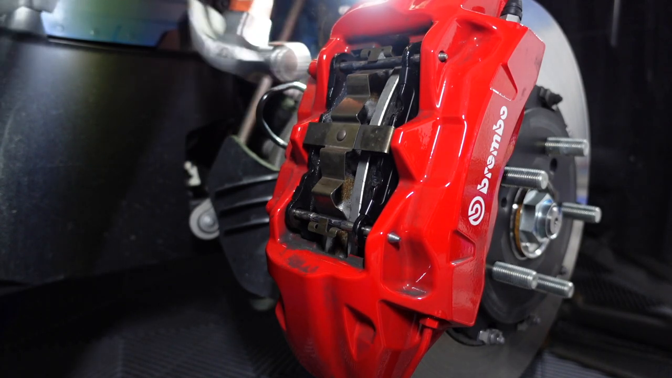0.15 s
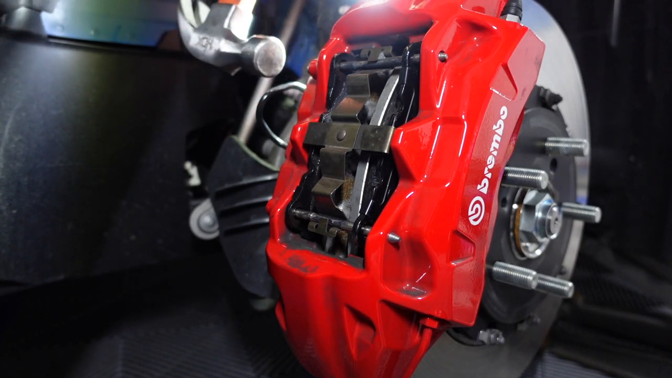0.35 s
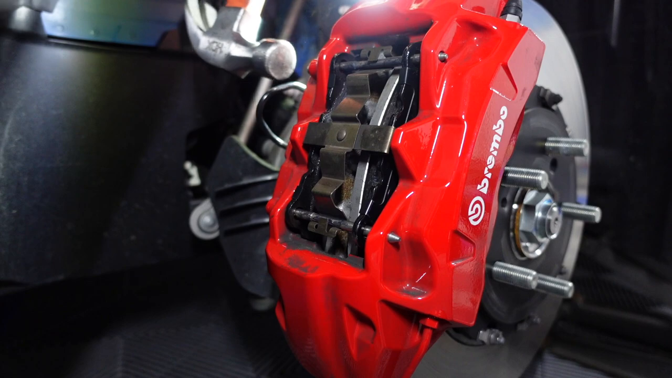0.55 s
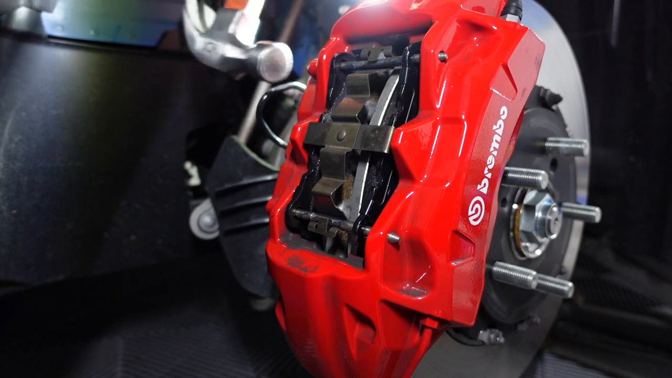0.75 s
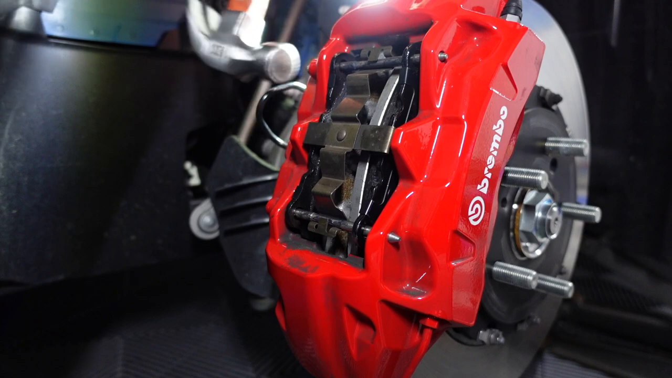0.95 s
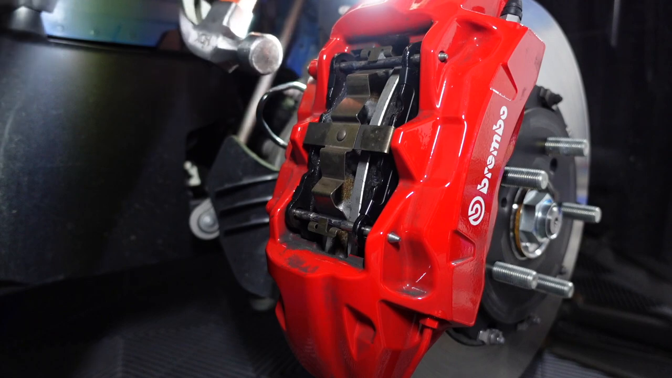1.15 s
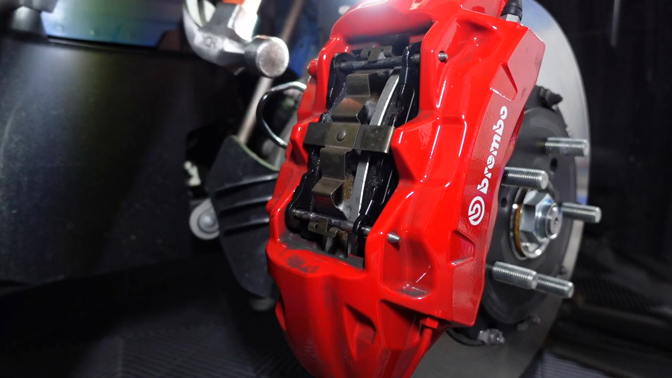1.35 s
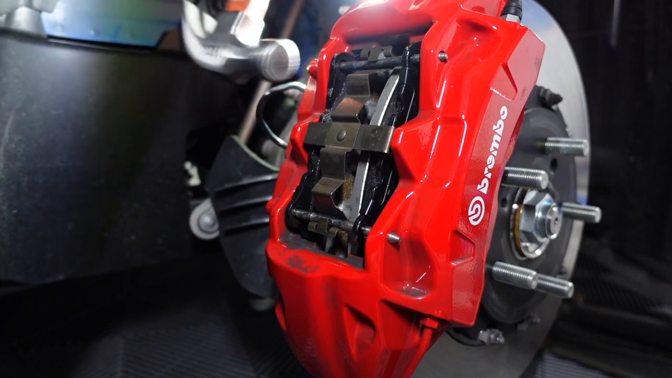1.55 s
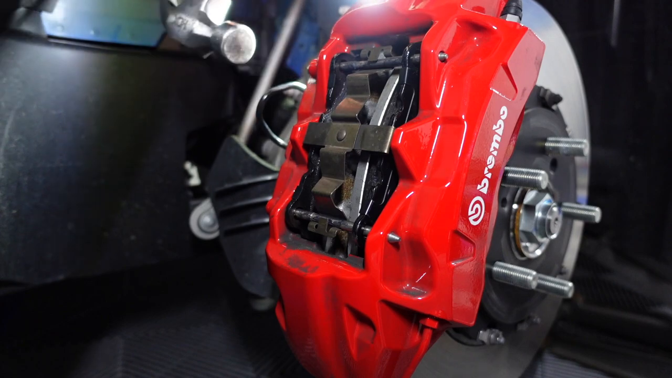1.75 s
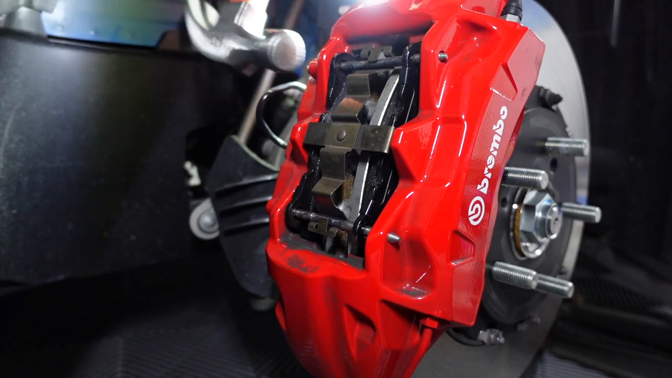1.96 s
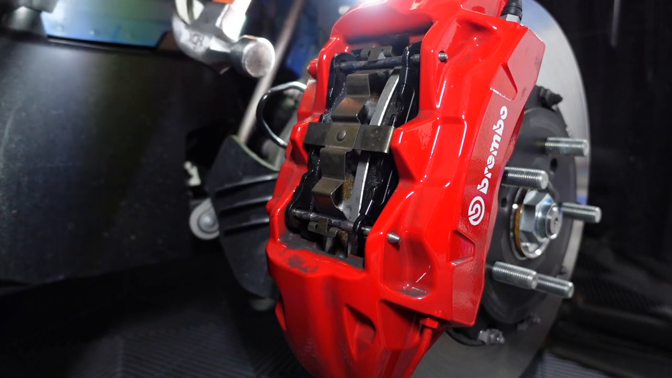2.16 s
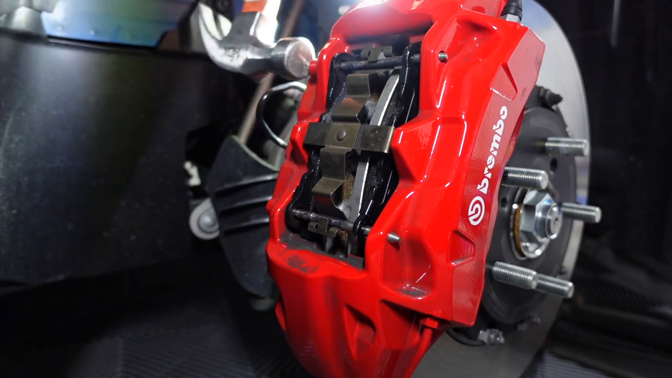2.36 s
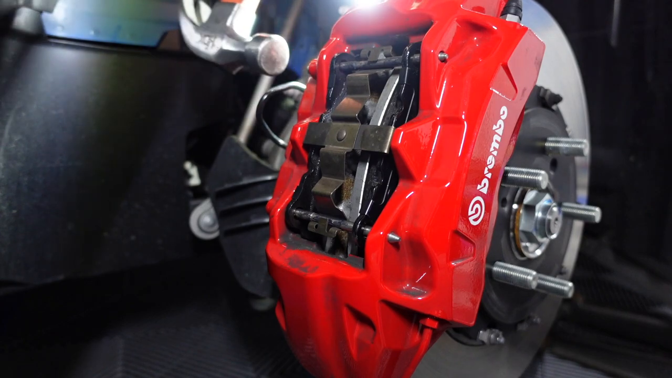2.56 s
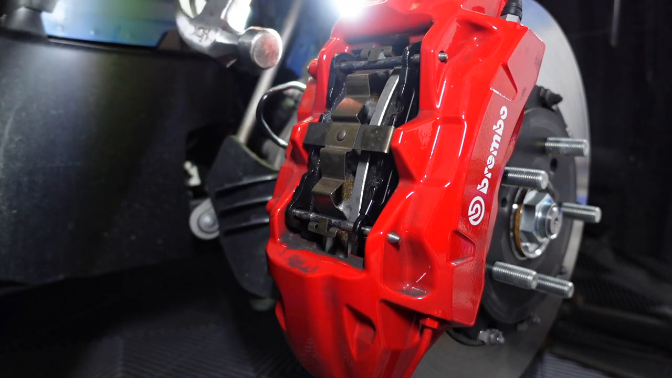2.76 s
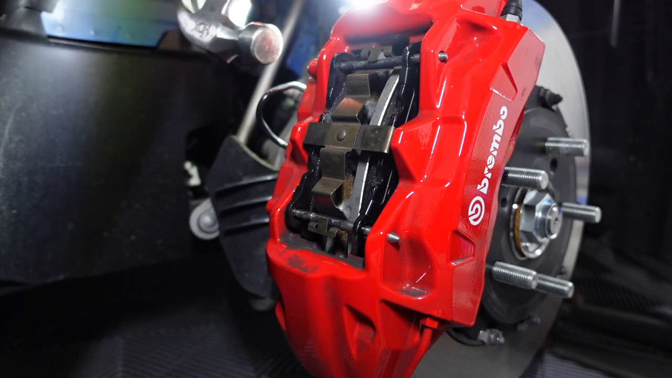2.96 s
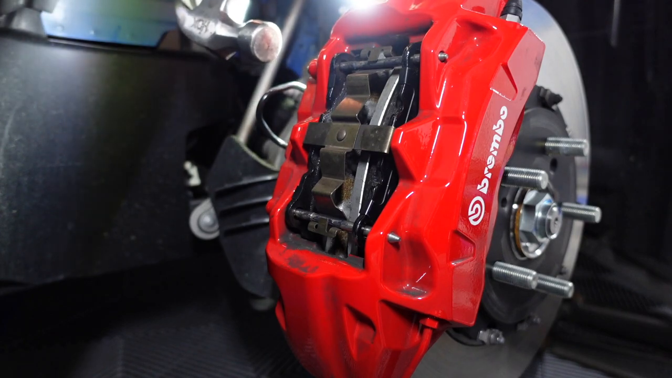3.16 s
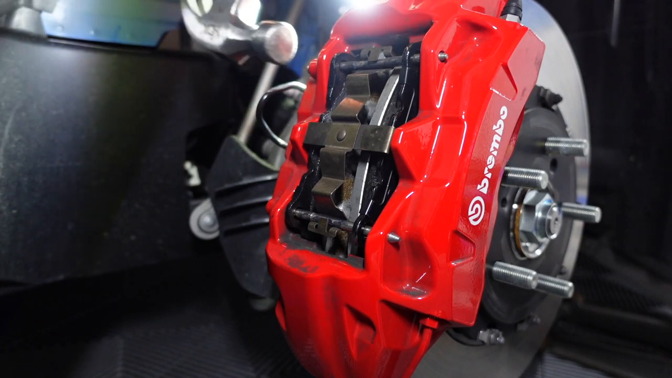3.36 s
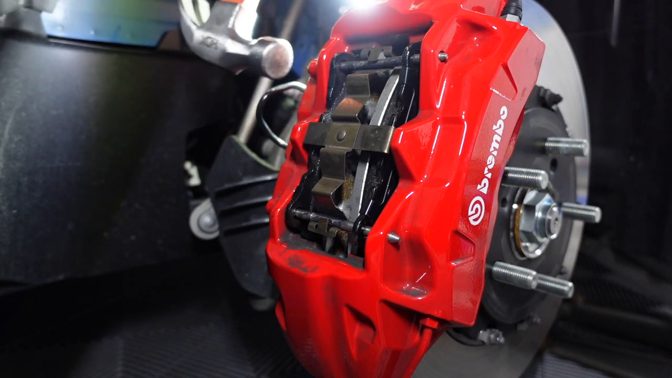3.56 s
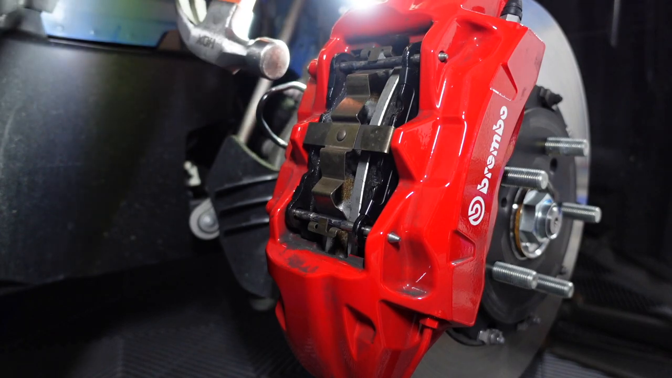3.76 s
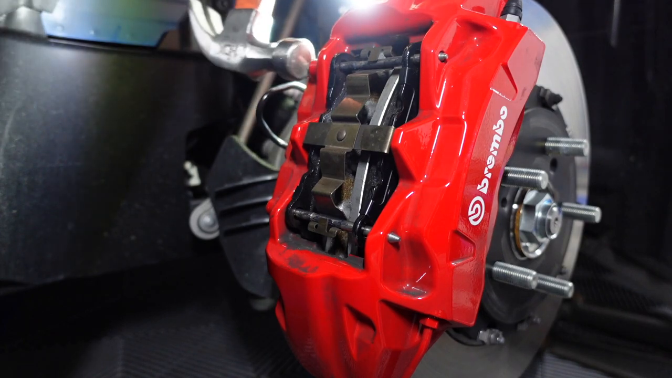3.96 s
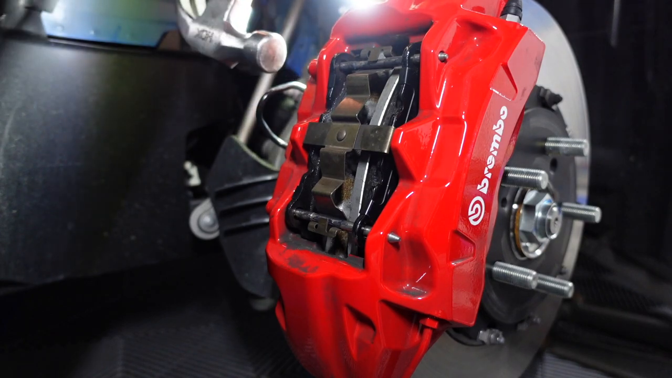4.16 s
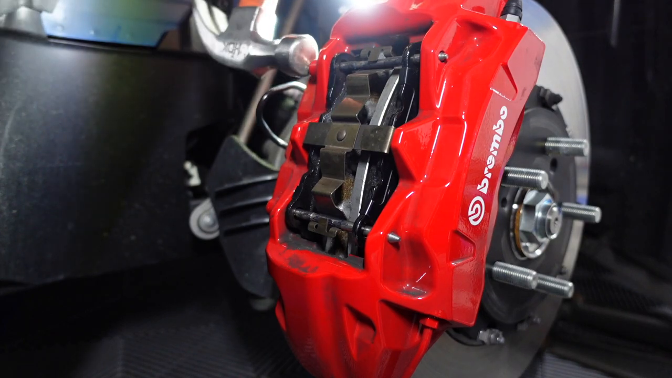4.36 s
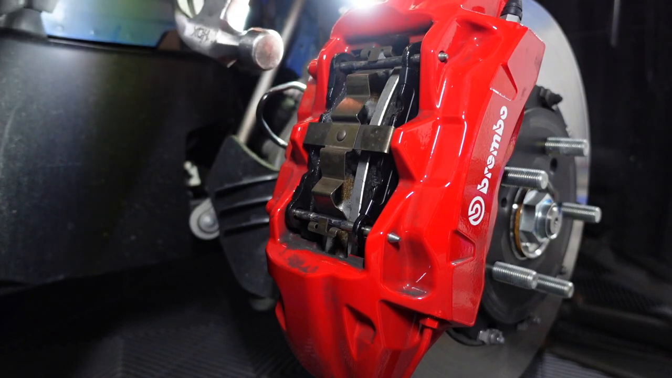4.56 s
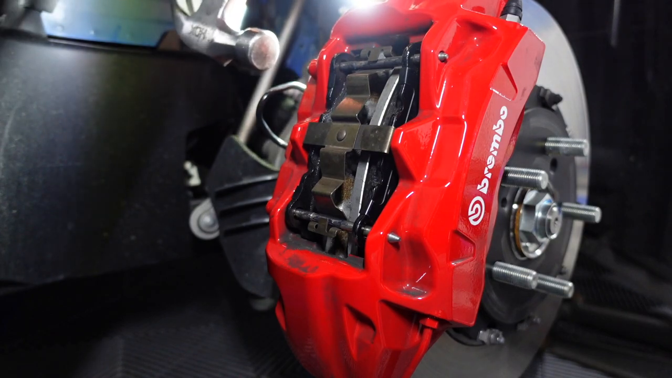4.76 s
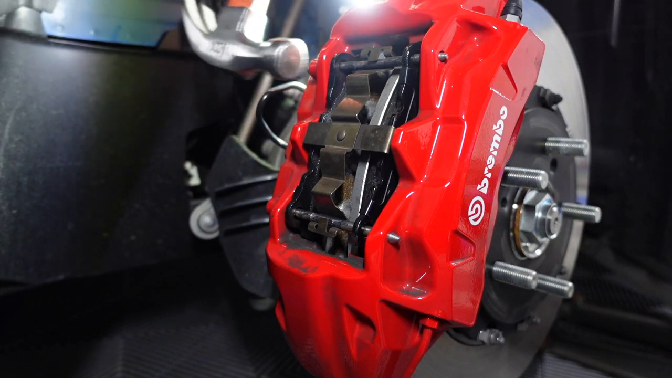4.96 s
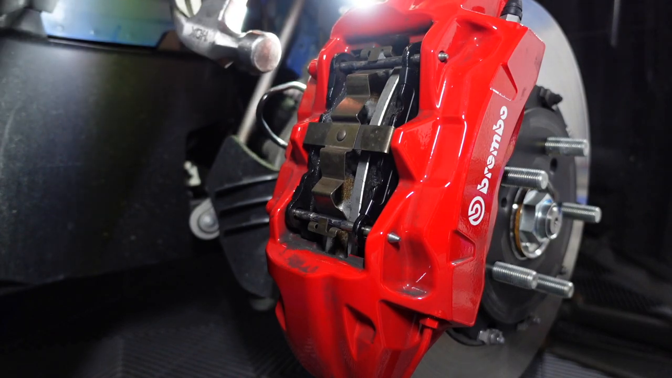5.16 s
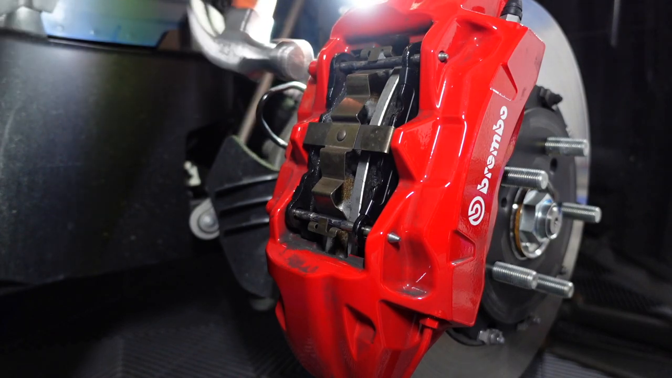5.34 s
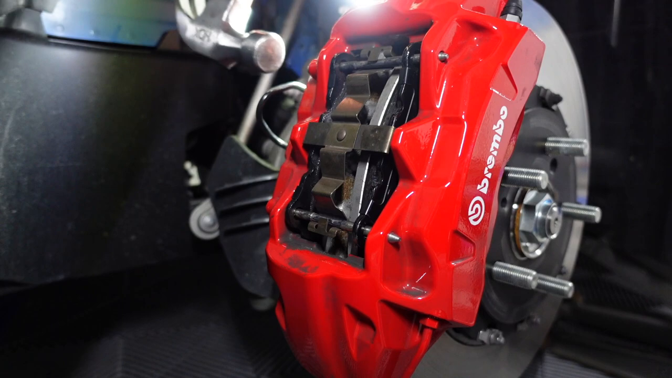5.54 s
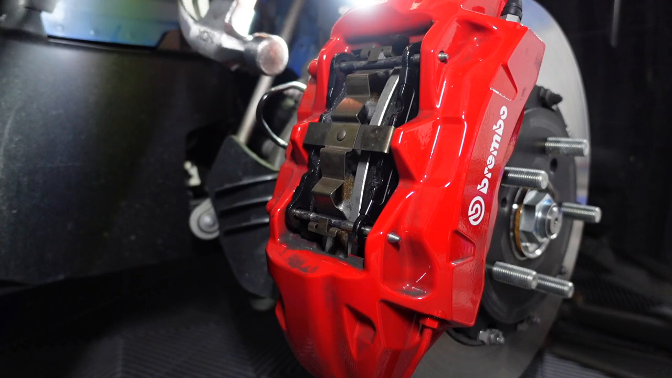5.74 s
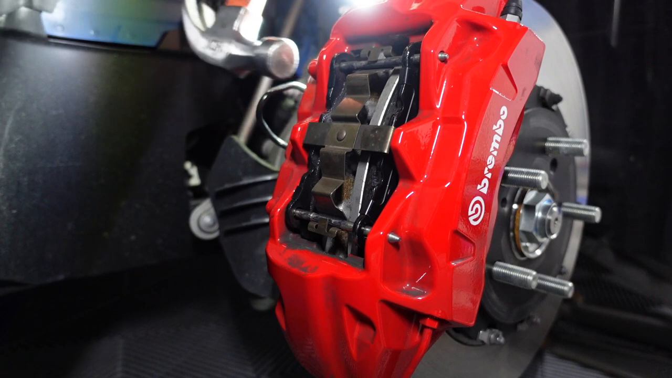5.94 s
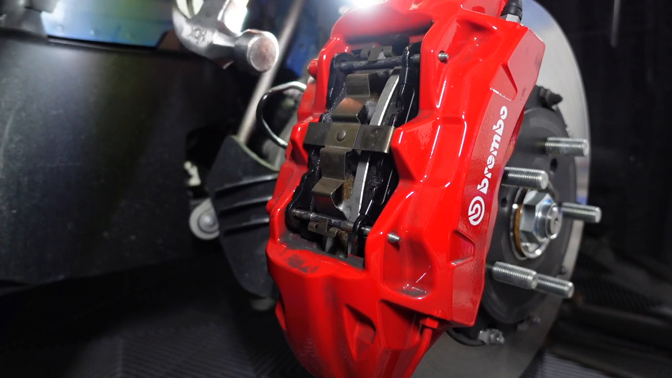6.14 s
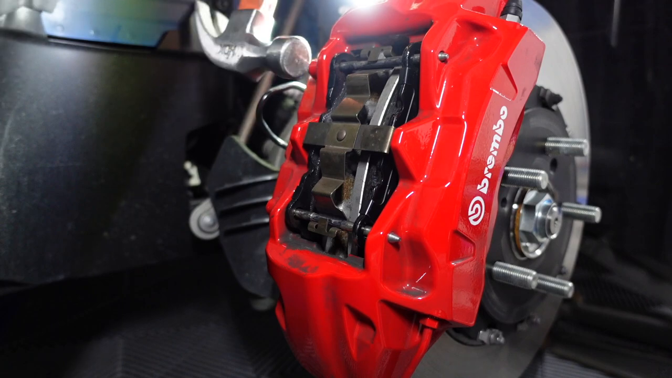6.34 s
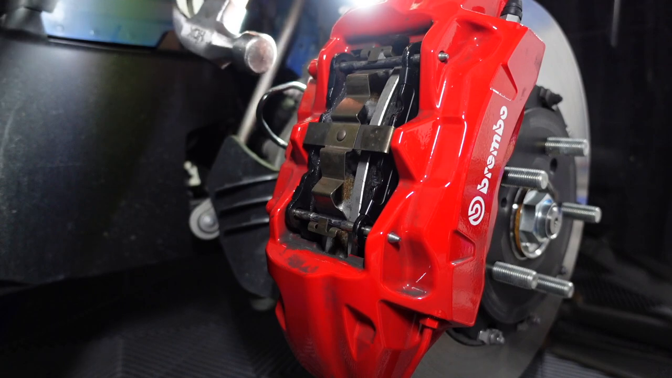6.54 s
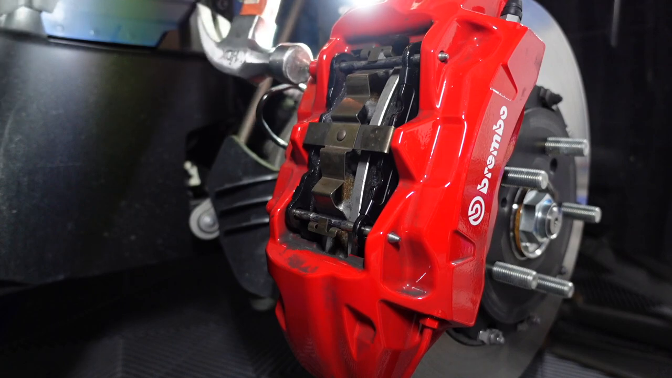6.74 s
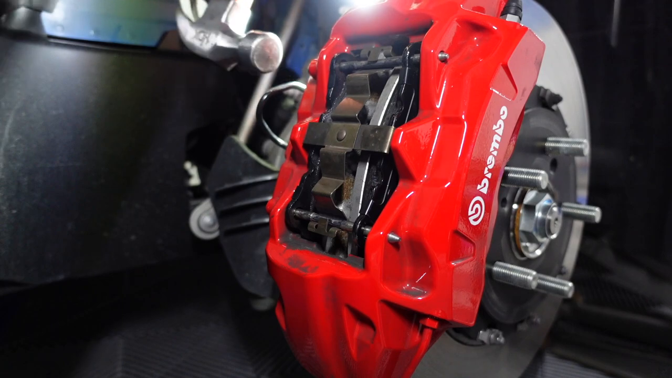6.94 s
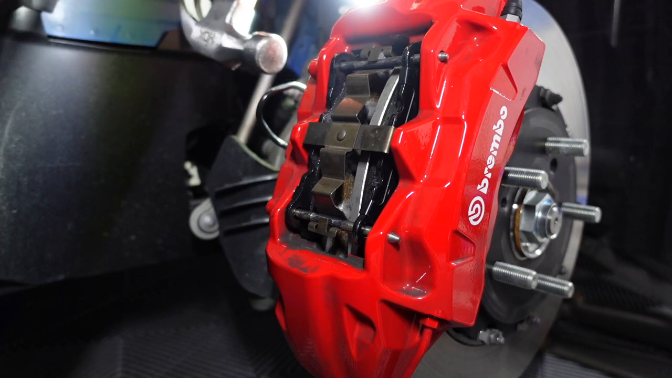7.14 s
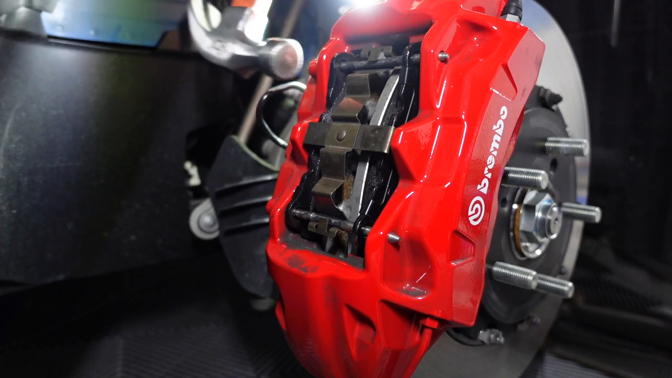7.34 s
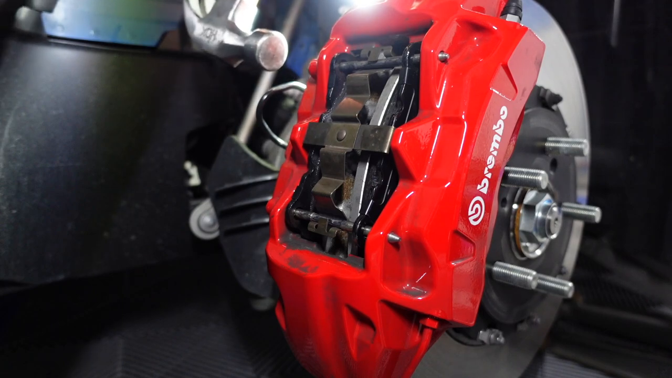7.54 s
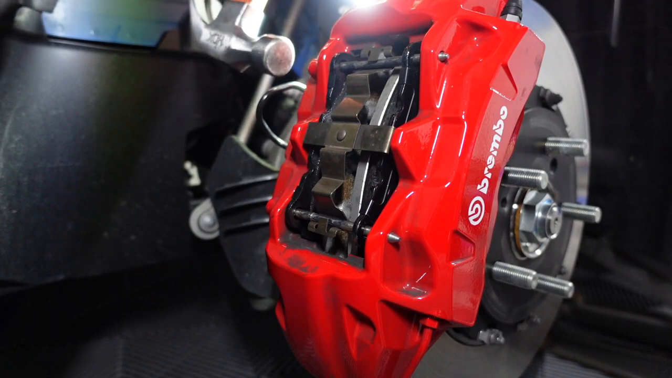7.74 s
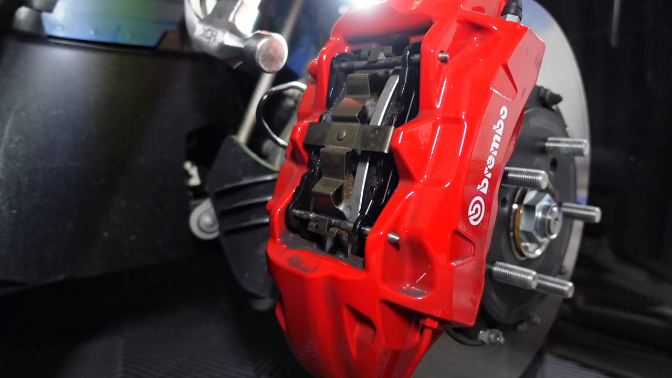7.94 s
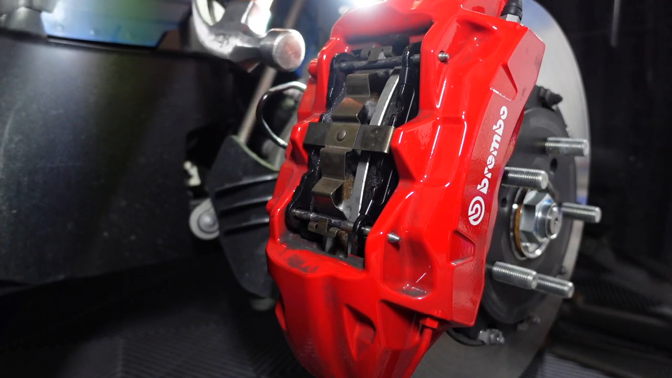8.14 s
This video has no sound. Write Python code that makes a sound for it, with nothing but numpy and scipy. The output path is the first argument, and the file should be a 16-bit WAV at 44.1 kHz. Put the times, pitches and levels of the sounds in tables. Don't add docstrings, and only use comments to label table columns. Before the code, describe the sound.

A steel hammer taps a metal pin through a brake caliper in a garage, sharp ringing cracks with pauses between, faint traffic rumbling outside.

```python
import sys
import numpy as np
from scipy import signal
from scipy.fft import rfft, irfft
from scipy.io import wavfile
from scipy.ndimage import uniform_filter1d

SR = 44100
rng = np.random.default_rng(int(sys.argv[2]) if len(sys.argv) > 2 else 0)


def convert_level_to_amplitude(level_db):
    exponent = np.asarray(level_db, float) / 20
    return 10 ** exponent


def waveform_to_disk(signal):
    frames = np.transpose(np.atleast_2d(signal))
    scaled = np.clip(frames, -1, 1) * 32767
    samples = np.round(scaled).astype(np.int16)
    wavfile.write(sys.argv[1], SR, samples)


N = 361619
LEAD = 22050
LENGTH = N + LEAD

# frequency in Hz, level in dB per Hz.
CRACK_SPECTRUM = [(1200, -24), (2500, 1.5), (4200, 1.5), (5500, 3), (7500, -3), (9500, -12.5), (13000, -45)]
# frequency in Hz, level in dB per Hz.
SIZZLE_SPECTRUM = [(4000, -34.5), (7500, -20.5), (9000, -8), (10500, -17), (12500, -16.5), (14500, -23.5),
                   (16500, -36)]


def level(x, db):
    return x * convert_level_to_amplitude(db) / np.sqrt(np.mean(x ** 2))


def shape(table, hz):
    points, *columns = np.transpose(table)
    return [np.interp(np.log(hz + 1), np.log(points), c) for c in columns]


def colour(x, table):
    size = 8192
    gain_db, = shape(table, np.arange(size // 2 + 1) * SR / size)
    ceps = irfft(np.log(convert_level_to_amplitude(gain_db)))
    ceps[1:size // 2] *= 2
    ceps[size // 2 + 1:] = 0
    impulse = irfft(np.exp(rfft(ceps)))
    return signal.fftconvolve(x, impulse)[:len(x)]


def band(x, lo_hz, hi_hz):
    return signal.sosfilt(signal.butter(2, [lo_hz, hi_hz], "band", fs=SR, output="sos"), x)


def train(at, size):
    x = np.full(LENGTH, 1e-18)
    x[at] = size
    return x


def ring(at, db, modes, scatter_db):
    out = 0
    chance = rng.standard_normal((len(at), len(modes)))
    for k, (hz, mode_db, t60_s) in enumerate(modes):
        pole = np.exp(2j * np.pi * hz / SR - np.log(1000) / (t60_s * SR))
        push = train(at, convert_level_to_amplitude(db + mode_db + scatter_db * chance[:, k]))
        out = out + (-1) ** k * signal.lfilter([1], [1, -pole], push).imag
    return out


def walk(rate_hz):
    k = int(SR / rate_hz)
    steps = np.repeat(rng.standard_normal(N // k + 1), k)
    return level(uniform_filter1d(uniform_filter1d(steps, k), k)[:N], 0)


def strikes():
    # start in seconds, force in dB, squareness (hammer head ring re force) in dB,
    # disc re force in dB, sharpness of the contact in dB.
    blows = [(-.24, -13, -0.5, -20, -6), (0.213, -11, -5, -32, -4), (0.634, -12, -11, -21.5, -9),
             (1.0157, -9.5, -8.5, -19.5, -0.5), (1.4605, -13, -17, -8.5, -2.1),
             (2.0114, -25, -8.5, -11.5, -5.5), (2.3986, -12.5, -10.5, -20.5, -2),
             (3.9156, -11, -8, -16, -1.5), (4.3507, -9.5, -8, -20.5, -0.7), (4.8924, -9, -7, -25, 0.5),
             (5.3717, -9.5, -3.2, -20, -2), (5.8477, -10.5, -0.5, -17, .1), (6.3388, -9, -7, -21, -3),
             (6.7606, -10.5, -2.5, -15.5, -.4), (7.2389, -12.5, -1.9, -14.5, 0.5)]
    # start in seconds, force in dB, disc re force in dB.
    touches = [
        (0.208, -26, 6),
        (1.505, -21, -1),
        (2.0537, -38.5, -12),
        (2.3917, -23, 4.5),
    ]
    graze_head_db, graze_loss_db = -17.5, -13
    grazes = [(s, db, graze_head_db, disc, 0) for s, db, disc in touches]
    s, crack_db, square_db, disc_share_db, sharp_db = np.transpose(grazes + blows)
    at = ((s + .001) * SR).astype(int) + LEAD
    bite_db = crack_db + graze_loss_db * (np.arange(len(s)) < len(grazes))
    edge_db = bite_db - 19.5 + sharp_db
    seats_s, seated_db = 6.55, -3.5
    pin_db = bite_db - 6.5 - 0.39 * square_db + seated_db * (s > seats_s)
    head_db = crack_db + square_db
    disc_db = crack_db + disc_share_db
    thud_db = 1.1 * np.minimum(crack_db + 11.5, 0) + 0.027 * (crack_db + 8.0) - 19.5
    return at, crack_db, edge_db, pin_db, head_db, disc_db, thud_db


def contact_spike(at, crack_db, edge_db):
    crack = colour(train(at, convert_level_to_amplitude(crack_db + 7.0)), CRACK_SPECTRUM)
    return -crack - colour(train(at, convert_level_to_amplitude(edge_db + 32)), SIZZLE_SPECTRUM)


def chatter(at, db, spectrum, decay_s=0.0052):
    t = np.arange(882) / SR
    envelope = np.exp(-t / decay_s) * np.minimum(t / 0.00073, 1)
    out = np.zeros(LENGTH)
    for i, size in zip(at, convert_level_to_amplitude(db)):
        out[i:i + len(t)] += size * rng.standard_normal(len(t)) * envelope
    return colour(out, spectrum)


def contact_chatter(at, crack_db, edge_db):
    forerun_s = .0012
    out = chatter(at - int(forerun_s * SR), crack_db - 16, CRACK_SPECTRUM, decay_s=.002)
    out = out + chatter(at, crack_db - 1.5, CRACK_SPECTRUM)
    return out + chatter(at, edge_db + 13.5, SIZZLE_SPECTRUM, decay_s=0.019)


def pin_and_head(at, pin_db, head_db):
    # frequency in Hz, level in dB, t60 in seconds.
    pin_modes = [(1527, -10, 0.026), (2967, -4.5, 0.018), (3155, -11, 0.053), (3644, -13, 0.012)]
    # frequency in Hz, level in dB, t60 in seconds.
    head_modes = [(4760, -11, 0.013), (5760, 0, 0.011), (6050, 0.5, 0.026), (6260, -2, 0.0089),
                  (6850, -1.5, 0.0056), (8120, -14.5, 0.015)]
    return ring(at, pin_db + 9, pin_modes, 1.2) + ring(at, head_db + 6, head_modes, 1.5)


def hammer_shank(at, head_db):
    # frequency in Hz, level in dB, t60 in seconds.
    shank_modes = [(3122, -2, .3), (6445, -5, .25), (8070, -9, .4)]
    return ring(at, head_db - 17, shank_modes, 1.5)


def disc_clank(at, disc_db):
    # frequency in Hz, level in dB, t60 in seconds.
    clank_modes = [(1710, -6, 0.014), (2030, -8, 0.03), (2258, -5, 0.023), (2594, -12, 0.069),
                   (2760, -11, 0.013)]
    return ring(at, disc_db + 4, clank_modes, 1.5)


def disc_ring(at, disc_db):
    # frequency in Hz, level in dB, t60 in seconds.
    disc_modes = [(1134, -12, .7), (1243, -11, .9), (1422, -13, .5), (1537, -11, .55), (1785, -2, .45),
                  (1841, -6, .7), (1914, -9, .65), (2051, -12, .45), (2297, -9, .7), (2367, -10, .85),
                  (2487, -8, .5), (2591, -11, .65)]
    return ring(at, disc_db - 3, disc_modes, 2.1)


def panels(at, db, table):
    t = np.arange(SR) / SR
    boom = 0
    for hz, mode_db, t60_s, swell_s in table:
        swell = -np.expm1(-(t / swell_s) ** 6)
        boom = boom + convert_level_to_amplitude(mode_db - 60 * t / t60_s) * np.sin(2 * np.pi * hz * t) * swell
    return signal.fftconvolve(train(at, convert_level_to_amplitude(db)), boom)[:LENGTH]


def car_body(at, thud_db):
    # frequency in Hz, level in dB per Hz.
    thud_spectrum = [(20, -44), (30, -18), (70, -10), (170, -28), (210, -18), (300, -19), (480, -18),
                     (620, -21.5), (1000, -12), (1250, -13), (1540, -24), (2100, -26.5), (2800, -19),
                     (4500, -62)]
    # frequency in Hz, level in dB, t60 in seconds, swell in seconds.
    panel_modes = [(39.9, -13.5, 0.78, 0.093), (61.9, -9, 0.6, 0.031), (122.3, -15, 0.46, 0.044),
                   (233.5, -2.5, 0.27, 0.036), (258, -7.5, 0.65, 0.054), (342.3, 0.5, 0.076, 0.0087),
                   (393.7, -16, 0.22, .05), (430, -5, 0.19, 0.042), (454.8, -6.5, 0.57, 0.069),
                   (485, -13, 0.65, 0.045), (504.6, -5.5, .2, 0.0067), (592, -14, 0.14, 0.006)]
    # frequency in Hz, level in dB, t60 in seconds, swell in seconds.
    boom_modes = [(275, .5, .26, .05), (212, -9, .22, .035)]
    # frequency in Hz, level in dB, t60 in seconds.
    chassis_modes = [(253, -14, 3.2), (360, -17, 2.5), (407, -19, 2.5), (451, 0, 2.6), (523, -12, 2.3),
                     (636, -16, 2.6), (700, -18, 2.3)]
    thud = -colour(train(at, convert_level_to_amplitude(thud_db + 32.5)), thud_spectrum)
    late = panels(at, thud_db + 2.5, panel_modes)
    late = late + panels(at, thud_db - np.max(thud_db) - 10.5, boom_modes)
    return thud, late + ring(at, thud_db - 17.5, chassis_modes, 0.6)


def arch(x):
    # delay in seconds, level in dB.
    echo_taps = [(.0006, -4.5), (.0013, -9), (.0021, -5.5), (.0034, -7), (.0058, -8), (.0085, -21)]
    out = x
    for k, (lag_s, db) in enumerate(echo_taps):
        out = out + (-1) ** k * convert_level_to_amplitude(db) * np.roll(x, int(lag_s * SR))
    return out


def garage(x):
    # frequency in Hz, t60 in seconds, build-up in seconds, level in dB.
    tail_bands = [(60.4, 3.6, 0.01, -1), (162, 0.74, 0.026, 1), (283, 0.8, 0.029, 20.5),
                  (870, 0.94, 0.0027, 5.5), (1890, 0.91, 0.014, 0), (5240, 0.81, 0.0023, -9.5),
                  (8500, 0.68, .004, -7), (14000, 0.5, 0.0025, -12), (16500, .25, .004, -9)]
    t = np.arange(2 * SR) / SR
    tail = 0
    for hz in 40 * 2 ** np.arange(0, 8.8, .5):
        t60_s, rise_s, db = shape(tail_bands, hz)
        late = convert_level_to_amplitude(db - 60 * t / t60_s)
        early = convert_level_to_amplitude(db + 4.5 - 60 * t / (0.19 * t60_s))
        noise = band(rng.standard_normal(len(t)), hz / 1.232, min(hz * 1.091, .47 * SR))
        tail = tail + (1 - np.exp(-t / rise_s)) * (late + early) * noise
    return signal.fftconvolve(x, tail)[:len(x)]


def hammer():
    at, crack_db, edge_db, pin_db, head_db, disc_db, thud_db = strikes()
    spike = contact_spike(at, crack_db, edge_db)
    steel = pin_and_head(at, pin_db, head_db)
    clank = disc_clank(at, disc_db)
    thud, body = car_body(at, thud_db)
    body = body + disc_ring(at, disc_db) + hammer_shank(at, head_db)
    wet = garage(convert_level_to_amplitude(-16) * spike + convert_level_to_amplitude(-18.5) * thud)
    wet = wet + garage(convert_level_to_amplitude(-34.5) * steel + convert_level_to_amplitude(-24.5) * clank)
    near = arch(convert_level_to_amplitude(3.5) * spike + convert_level_to_amplitude(-5) * steel + convert_level_to_amplitude(-9.5) * clank + convert_level_to_amplitude(10.5) * thud)
    return (near + contact_chatter(at, crack_db, edge_db) + body + wet)[LEAD:]


def far_engine():
    # time in seconds, firing rate in Hz, level in dB.
    revs = [
        (4.6, 73.5, -62),
        (5.0, 87, -48),
        (5.8, 88, -43.5),
        (6.4, 102, -45),
        (6.9, 117.9, -50.5),
        (7.3, 106.8, -53),
        (8.2, 111.3, -55.5),
    ]
    t = np.arange(N) / SR
    s, hz, db = np.transpose(revs)
    turns = np.cumsum(np.interp(t, s, hz) * (1 + 0.011 * walk(8))) / SR
    return np.sin(2 * np.pi * turns) * convert_level_to_amplitude(np.interp(t, s, db, left=-90) + 2.2 * walk(10))


def far_traffic():
    # time in seconds, level in dB.
    swells = [
        (0.0, -52),
        (1.16, -55),
        (3.33, -56),
        (3.75, -58.5),
        (4.02, -55),
        (6.37, -45),
        (7.15, -43),
        (7.47, -37.5),
        (7.79, -47),
        (8.2, -47),
    ]
    traffic_db = np.interp(np.arange(N) / SR, *np.transpose(swells))
    deep = level(band(rng.standard_normal(N), 34, 46), 0)
    deep = deep * convert_level_to_amplitude(traffic_db - 3.5 + 1.5 * walk(2.2))
    road = level(band(band(rng.standard_normal(N), 94, 140), 94, 140), 0)
    return deep + road * convert_level_to_amplitude(traffic_db - 6 + 1.5 * walk(3))


def room_air():
    # frequency in Hz, level in dB per Hz.
    air_spectrum = [(12, -25), (20, 8), (123, -4.5), (193, -10), (241, -9.5), (399, -18), (446, -19.5),
                    (574, -23.5), (1090, -26.5), (14300, -48.5), (16000, -55)]
    return level(colour(rng.standard_normal(N), air_spectrum), -54.5) * convert_level_to_amplitude(0.88 * walk(1.5))


def scene():
    return (hammer() + room_air() + far_traffic() + far_engine())[None]


def band_limit(x):
    return signal.sosfilt(signal.butter(12, 16820, fs=SR, output="sos"), x)


def record(dry):
    top_hz = 15900
    cut = signal.ellip(8, .2, 60, top_hz, fs=SR, output="sos")
    rounded = np.tanh(0.57 * dry) / 0.61
    return band_limit(signal.sosfilt(cut, rounded))


dry = scene()
out = record(dry)
waveform_to_disk(out)
```